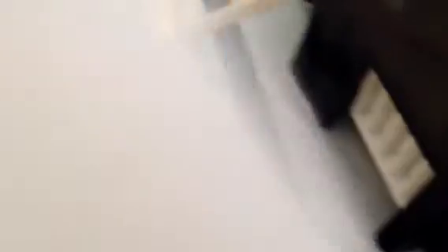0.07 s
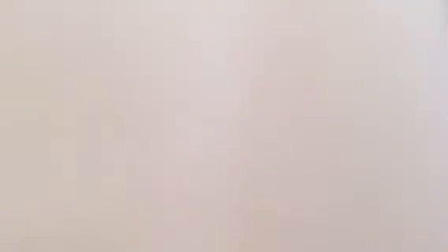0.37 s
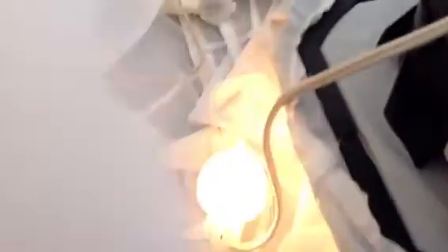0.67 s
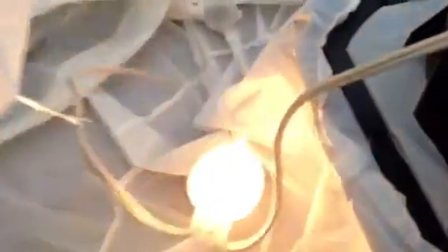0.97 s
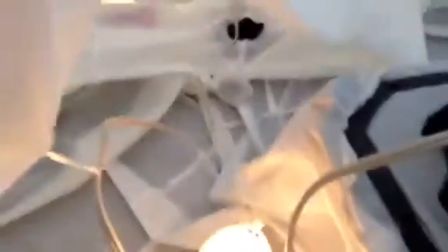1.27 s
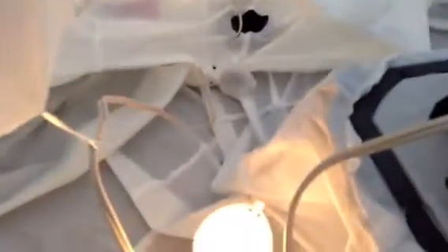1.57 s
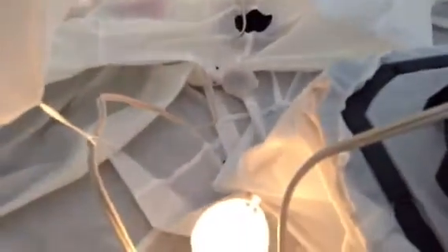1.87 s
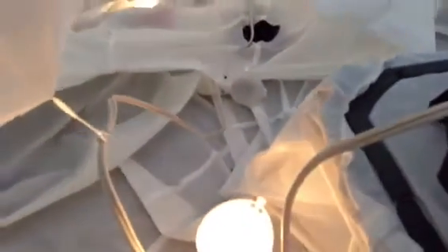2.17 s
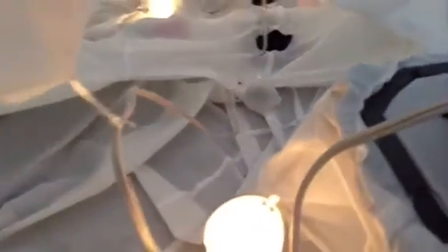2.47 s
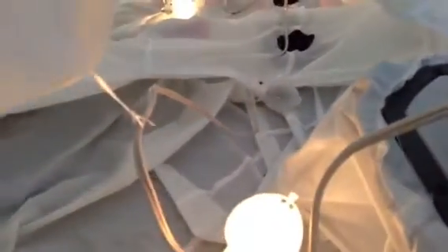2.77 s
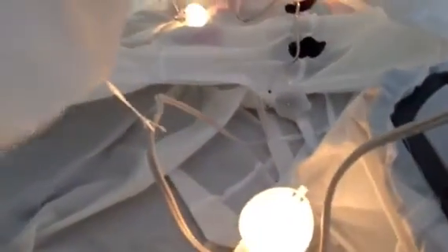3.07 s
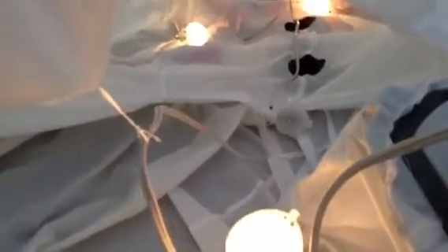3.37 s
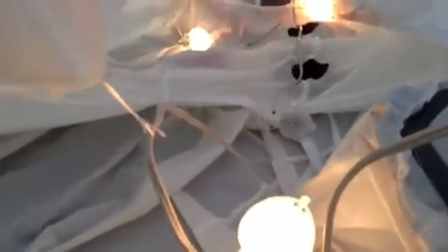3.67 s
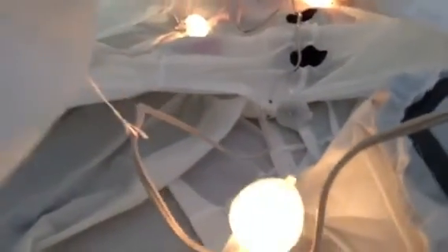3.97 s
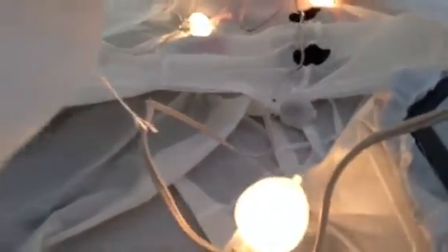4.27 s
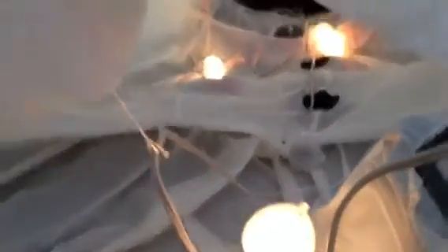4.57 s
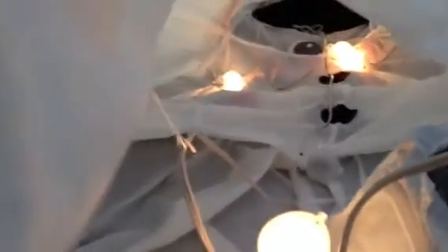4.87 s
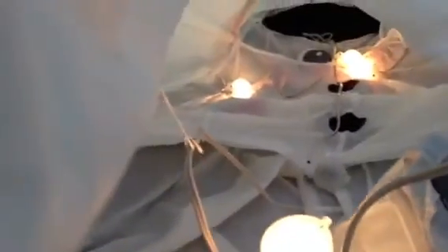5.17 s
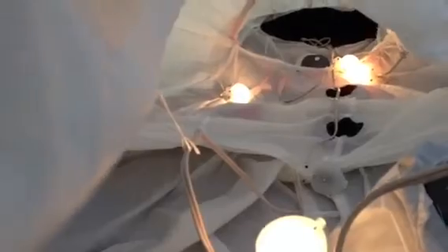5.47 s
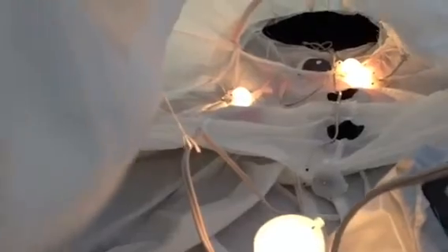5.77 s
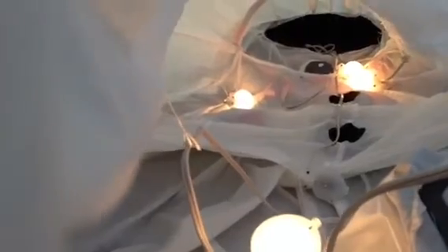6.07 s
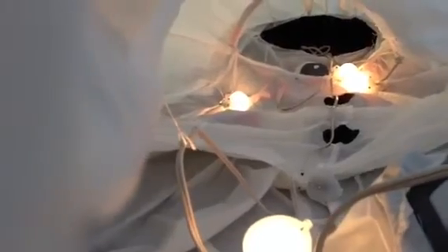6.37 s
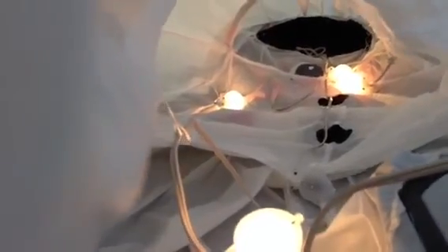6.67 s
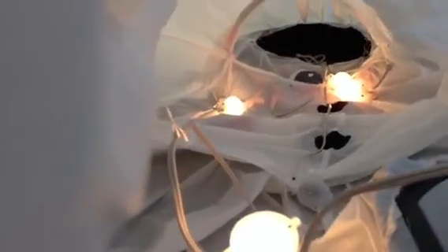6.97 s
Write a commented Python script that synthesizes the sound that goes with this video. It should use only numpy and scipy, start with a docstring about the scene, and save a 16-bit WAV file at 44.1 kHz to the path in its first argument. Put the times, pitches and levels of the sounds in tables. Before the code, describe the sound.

Loud, close scrapes and snaps of nylon open the sound as a hand-held microphone slides into an inflatable, dulled for a moment by the cloth. Inside, a fan whirs with a steady hum, a thin whine and rushing air. About halfway through, softer rustles start and the air grows into a brighter hiss. Several crisp snaps of cloth come near the end while the whine fades and the fan keeps blowing.

```python
"""A small blower keeps a fabric inflatable filled: its blades hum and whine over rushing air.
First, with a brief thin hiss of air, a hand-held camera is pushed inside; nylon drags, rubs and snaps
on it, briefly muffling it. From about one second on, the blower is heard almost alone. Around four
seconds the rubbing returns, and near five the camera crosses the air stream, so the hiss swells. A last
flurry of snaps comes after six. At each loud snap the camera's limiter briefly turns everything down."""
import sys
import numpy as np
from scipy import signal
from scipy.fft import rfft, irfft, next_fast_len
from scipy.io import wavfile
from scipy.ndimage import uniform_filter1d, minimum_filter1d, map_coordinates

SR = 44100
rng = np.random.default_rng(int(sys.argv[2]) if len(sys.argv) > 2 else 0)


def transcribe(u):
    """Save the signal u as a 16-bit wav file named by the first command-line argument.

    u: samples, shape (n,) or (channels, n), limited to [-1, 1]; the rate is SR.
    q: integer samples, one column per channel.
    """
    v = np.clip(np.atleast_2d(u).T, -1, 1)
    q = np.round(v * 32767).astype(np.int16)
    wavfile.write(sys.argv[1], SR, q)


N = 313551

# how often a fan blade passes: time_s, pitch_hz
BLADE_RATE = [(0, 337.8), (1.5, 337.5), (4, 338.2), (7.1, 337.8)]
# the fan's faint higher tones: blade_rate_multiple, level_db
FAINT_TONES = [(3, -45), (6, -68), (10, -56)]
# the whine, louder when the outlet faces the camera: time_s, level_db
WHINE_LEVEL = [(.2, -28), (.9, -34), (1.35, -30), (3.8, -29), (5.03, -26.5), (5.95, -32), (6.45, -36.5),
               (6.9, -40.5)]

# how near the camera is to the air stream: time_s, nearness_0_to_1
NEARNESS = [(0, 0.16), (4.4, 0), (4.9, 0.63), (5.6, 0.97), (7.1, 1)]
# tone colours of the air, from low roar to high hiss: pitch_hz, relative_db
ROAR_COLOUR = [(20, -54), (70, -33), (120, -19.5), (170, -5.5), (230, -2.5), (340, -7), (480, -4.5),
               (720, -2.5), (890, -9), (1030, -3), (1220, -8), (1600, -52), (4000, -70)]
WHIR_COLOUR = [(100, -80), (1000, -42), (1300, 2), (1480, 4.5), (1850, 3), (2100, 2), (2700, -6),
               (3100, -3), (4000, -47)]
WHOOSH_COLOUR = [(100, -80), (2000, -10), (2800, -9), (3300, 1.5), (4300, 0), (5000, 0.5), (5900, -1),
                 (7000, -11.5), (9000, -40)]
FAR_HISS_COLOUR = [(100, -80), (4500, -3.5), (6300, -0.5), (8000, 1.5), (10000, -1), (13000, 2),
                   (15500, -4.5)]
NEAR_HISS_COLOUR = [(100, -80), (5000, -5), (6300, -3), (7200, -3.5), (9000, 1.5), (10200, 3.5),
                    (11500, -3.5), (13000, -3), (15500, -16)]
# air spilling past the nearest fold: pitch_hz, relative_db
SPILL_COLOUR = [(60, -60), (220, 3), (500, -1), (850, -1), (1200, 8), (1450, -2.5), (2000, -34),
                (4000, -50)]
# the whoosh before the air stream lifts it: time_s, level_db
WHOOSH_BASE = [(2.7, -42.5), (3.1, -38), (4.2, -33.5), (5.6, -38), (6.9, -34)]
# pitches the blower's housing lifts or dips: pitch_hz, width_hz, gain_db
HOUSING_RESONANCES = [(1090, 180, -5.5), (2305, 110, 3.5), (2634, 134, 8.5), (3352, 330, 7),
                      (4040, 130, 7.5), (5540, 91, 4), (7000, 300, 3), (8170, 250, 3), (9930, 200, 1.5),
                      (10170, 280, 6), (11640, 300, 3)]
# the hollow echo of a close fold: pitch_hz, width_hz, gain_db
FOLD_ECHO = [(2150, 400, -2.5), (2610, 220, 0), (5100, 690, -4.5), (7370, 1200, 7.5), (8700, 340, -1.5),
             (11400, 420, 1), (11650, 400, 2.5)]

# folds snapping on the camera: start_s, level_db, pitch_hz, length_cycles
FOLD_SNAPS = [(.189, 5.5, 780, 1.7), (.559, 10, 1200, 2.6), (0.9326, 7, 6300, 9.9), (0.9673, 6, 2430, 1.7),
              (1.0028, -0.5, 1820, 0.55), (1.0297, -2.5, 1530, 4.1), (1.629, -6, 4000, 1.3),
              (2.799, -16, 3850, 7), (4.264, -15, 222, 3.3), (4.3828, -8, 332, 8.3), (4.657, -8, 420, 4.9),
              (4.7829, -5.5, 332, 5.3), (4.884, -6, 714, 3.7), (5.158, .5, 950, 3.3),
              (6.139, 7.5, 1740, 3.7), (6.1815, 1, 1120, 2.3), (6.1938, 7, 1300, 4.9),
              (6.410, 6, 1250, 1.1), (6.4246, -4.5, 1120, 3.4), (6.4248, 0.5, 7600, 8.3)]
# the long drag through the opening: time_s, level_db
DRAG_LEVEL = [(.12, -27.5), (.24, -21.5), (.33, -12), (.39, -3.5), (.47, -13.5), (.56, -12.5), (.65, -20.5),
              (.78, -14), (.87, -26), (1.15, -30)]
# nylon rubs, plus a thin, high hiss of air at 0.16 s: peak_s, rise_s, level_db, pitch_hz, sharpness_q
RUBS_AND_HISS = [(0.139, 0.011, -16, 681, 0.79), (0.16, .09, -28, 13780, 5.9),
                 (0.193, 0.003, -7.5, 2480, 0.2), (.27, 0.012, -12.5, 750, 0.35),
                 (.3, 0.0055, -9.5, 1110, 0.4), (0.354, .014, -5, 1500, .6),
                 (0.445, 0.0092, -9.5, 760, 0.96), (0.463, .016, -3.5, 214, 1.4),
                 (0.506, 0.0094, -4, 298, 0.58), (0.536, .02, -6.5, 800, 0.71), (0.6, 0.012, -7, 450, .6),
                 (0.62, 0.019, -11, 1080, 0.79), (0.705, 0.037, -11, 4400, 0.093),
                 (0.916, 0.031, -24, 396, 0.7), (1.012, 0.0096, -14.5, 443, 0.88),
                 (1.053, 0.022, -23, 1800, 0.059), (3.112, 0.076, -31.5, 9600, 2.4),
                 (3.94, 0.029, -25, 2800, 0.19), (4.02, 0.17, -27.5, 307, 1.16),
                 (4.393, 0.072, -23.5, 340, 0.84), (4.425, 0.034, -21.5, 4400, 1.1),
                 (4.433, .033, -20.5, 13000, 1), (4.675, 0.056, -21.5, 12000, .8),
                 (4.706, 0.053, -15.5, 3250, 0.77), (4.73, 0.078, -21.5, 517, 0.21),
                 (4.925, 0.26, -28, 910, 0.4), (5.105, 0.076, -26, 1060, 2.2),
                 (5.334, .035, -17, 2470, 0.92), (5.415, 0.1, -25, 445, 1.1),
                 (5.627, 0.017, -24, 600, 0.44), (6.111, 0.025, -15.5, 6800, 3),
                 (6.126, 0.043, -22, 710, 0.46), (6.224, .042, -15.5, 1370, 1.4),
                 (6.221, 0.031, -16, 6900, 0.66), (6.281, 0.019, -22.5, 1070, 1.8),
                 (7.066, 0.0075, -25.5, 380, 1.8)]
# tone colour of the cloth: pitch_hz, relative_db
NYLON_COLOUR = [(30, -18), (80, -10.5), (170, 9), (1500, 0.5), (5000, -3.5), (10000, -6.5), (15500, -11.5)]
# cloth pressed over the microphone: time_s, cover_0_to_1
MIC_COVER = [(.36, 0.3), (.395, 0.67), (.43, 0.54), (.48, 0.65), (.545, 0.49), (.585, 0.45), (.65, 0.11)]


def fan_blades(hum_db=-27):
    """Spinning blades sing at multiples of their passing rate; swirling air makes each tone flutter."""
    rate_hz = curves(BLADE_RATE)[0] + 0.085 * wobble(5.28)
    phase = 2 * np.pi * np.cumsum(rate_hz) / SR

    def tone(multiple, flutter):
        shake = 1 + flutter * (wobble(75) + 1j * wobble(75))  # shakes both strength and phase
        return np.real(np.exp(1j * multiple * phase) * shake)

    hum = amp(hum_db) * tone(2, flutter=0.027)  # fills the shell evenly
    whine = amp(curves(WHINE_LEVEL)[0]) * tone(5, flutter=0.22)
    return hum + whine + sum(amp(db) * tone(round(k), flutter=0.49) for k, db in FAINT_TONES)


def airflow():
    """A steady roar fills the shell; the higher sounds change with the folds around the camera."""
    near = np.clip(curves(NEARNESS)[0], 0, 1)
    whir_db, whoosh_db, hiss_db = air_levels(near)
    roar = amp(-32.5 - 0.97 * near + 0.1 * wobble(3.8)) * rush(ROAR_COLOUR, patchy_db=1.0)
    spill = amp(-38) * near * rush(SPILL_COLOUR, patchy_db=5)
    whir = amp(whir_db) * rush(WHIR_COLOUR, patchy_db=2.0)
    whoosh = amp(whoosh_db) * rush(WHOOSH_COLOUR, patchy_db=2.0)
    far_hiss = np.sqrt(1 - near) * rush(FAR_HISS_COLOUR, patchy_db=2.6)
    near_hiss = np.sqrt(near) * rush(NEAR_HISS_COLOUR, patchy_db=1.7)
    hiss = amp(hiss_db + 0.13 * wobble(12)) * (far_hiss + near_hiss)
    air = roar + spill + whir + whoosh + hiss
    hollow_air = filtered(air, lambda hz: amp(bumps(FOLD_ECHO, hz)))
    echo_share = near ** 4  # the fold only colours the air once it is very close
    return (1 - echo_share) * air + echo_share * hollow_air


def air_levels(near, crossing_s=4.856, rise_s=0.14, fall_s=0.64):
    """Whir, whoosh and hiss all swell as the camera crosses the air stream once."""
    age_s = np.arange(N) / SR - crossing_s
    swell = np.exp(-np.where(age_s < 0, (age_s / rise_s) ** 2, age_s / fall_s))
    whir_db = -21 + 0.43 * curves(WHINE_LEVEL)[0] + 3 * swell  # from the outlet, like the whine
    whoosh_db = curves(WHOOSH_BASE)[0] + 6 * swell
    hiss_db = -32.5 + 2 * near + 9 * swell
    return whir_db, whoosh_db, hiss_db


def rush(colour, patchy_db):
    """Swirling air: noise with drifting loud and soft patches, coloured by the blower's housing."""
    bands = signal.stft(rng.standard_normal(N), nperseg=512)[2]
    patches = uniform_filter1d(rng.standard_normal(bands.shape), size=4, axis=0)  # smooth over pitch
    patches = uniform_filter1d(patches, size=40, axis=1)  # and over time
    air = signal.istft(bands * amp(patchy_db * unit(patches)), nperseg=512)[1][:N]
    return unit(filtered(air, lambda hz: amp(along(colour, hz) + bumps(HOUSING_RESONANCES, hz))))


def fold_snaps(tick_strength=0.072, tick_s=0.0045, low_cut_hz=190):
    """A fold that flips gives one quickly dying swing and a faint tick."""
    out, t = np.zeros(N + SR), np.arange(SR // 20) / SR
    for start_s, level_db, pitch_hz, length_cycles in FOLD_SNAPS:
        angle = 2 * np.pi * pitch_hz * t
        swing = np.sin(angle) * angle * np.exp(-2 * angle / length_cycles)
        tick = tick_strength * rng.standard_normal(len(t)) * amp(-60 * t / tick_s)
        out[round(start_s * SR):][:len(t)] += amp(level_db) * (swing / np.abs(swing).max() + tick)
    return signal.sosfilt(signal.butter(2, low_cut_hz, "highpass", fs=SR, output="sos"), out[:N])


def opening_drag(catch_db=2.1, catches_per_s=35):
    """The opening catches unevenly on the camera; the flatter it is pressed, the deeper it sounds."""
    pressed = np.clip(1.55 * curves(MIC_COVER)[0], 0, 1)
    level_db = np.interp(np.arange(N) / SR, *np.transpose(DRAG_LEVEL), right=-np.inf)
    light = np.sqrt(1 - pressed) * ring(grainy_noise(), pitch_hz=1500, sharpness_q=0.13)
    deep = np.sqrt(pressed) * ring(grainy_noise(), pitch_hz=273, sharpness_q=0.5)
    return amp(level_db + catch_db * wobble(catches_per_s)) * (light + deep)


def rubs_and_hiss(fall_over_rise=1.07):
    """Nylon rubs on the camera, and air hisses briefly at the start; each sound swells and fades."""
    out, t, noise = np.zeros(N), np.arange(N) / SR, grainy_noise()
    for peak_s, rise_s, level_db, pitch_hz, sharpness_q in RUBS_AND_HISS:
        progress = (t - peak_s) / np.where(t < peak_s, rise_s, rise_s * fall_over_rise)
        span = np.abs(progress) < 3
        swell = np.exp(-progress[span] ** 2)
        burst = np.roll(noise, rng.integers(N))[span]
        out[span] += amp(level_db) * swell * ring(burst, pitch_hz, sharpness_q)
    return out


def grainy_noise(clicks_per_s=2500, grain_share=0.37, judder_db=2):
    """Tiny clicks, like the slips of sliding nylon, mixed with smooth noise and juddering in strength."""
    clicks = unit(rng.standard_normal(N) * (rng.random(N) < clicks_per_s / SR))
    noise = np.sqrt(grain_share) * clicks + np.sqrt(1 - grain_share) * rng.standard_normal(N)
    return noise * amp(judder_db * wobble(160))


def ring(noise, pitch_hz, sharpness_q):
    """Make noise ring as a rubbed patch of cloth does; more sharpness gives a clearer pitch."""
    def response(hz):
        resonance = 1j * hz / (pitch_hz ** 2 - hz ** 2 + 1j * hz * pitch_hz / sharpness_q)
        return amp(along(NYLON_COLOUR, hz)) * resonance

    return unit(filtered(noise, response))


def amp(db):
    """Turn decibels into a number to multiply by."""
    return 10 ** (np.asarray(db) / 20)


def unit(x):
    """Scale a signal to an average strength (rms) of 1."""
    return x / np.sqrt(np.mean(x ** 2) + 1e-20)


def along(colour, hz):
    """Read a tone colour in dB between its listed pitches."""
    pitch_hz, relative_db = np.transpose(colour)
    return np.interp(np.log(hz + 1), np.log(pitch_hz + 1), relative_db)


def bumps(rows, hz):
    """Add up rounded peaks and dips, in dB."""
    return sum(db / (1 + (2 * (hz - centre) / width) ** 2) for centre, width, db in rows)


def curves(rows):
    """One value per sample for each column after the time."""
    time_s, *columns = np.transpose(rows)
    return [np.interp(np.arange(N) / SR, time_s, column) for column in columns]


def wobble(points_per_s):
    """A smooth curve through random points."""
    points = rng.standard_normal(int(N * points_per_s / SR) + 4)
    return map_coordinates(points, [np.arange(N) * points_per_s / SR])


def filtered(x, response):
    """Turn each frequency in x up or down by response(hz)."""
    size = next_fast_len(len(x) + 8192)
    return irfft(rfft(x, size) * response(np.fft.rfftfreq(size, 1 / SR)), size)[:len(x)]


def scene(muffle_hz=3800):
    """One microphone hears it all, and loses the treble while cloth covers it."""
    sound = fan_blades() + airflow() + opening_drag() + rubs_and_hiss() + fold_snaps()
    cover = np.clip(curves(MIC_COVER)[0], 0, 1)
    muffled = filtered(sound, lambda hz: 1 / (1 + (hz / muffle_hz) ** 4))
    return np.tile((1 - cover) * sound + cover * muffled, (2, 1))


def record(dry, start_s=0.12, ceiling=0.83, release_db_per_s=150, top_hz=15550):
    """The camera starts, turns loud peaks down at once, soon recovers and cuts the highest treble."""
    t = np.arange(N) / SR
    sound = dry[0] * np.clip((t - start_s) * SR / 64, 0, 1)  # fades in over 64 samples
    over_db = 20 * np.log10(np.maximum(np.abs(sound) / ceiling, 1))
    dip_db = np.maximum.accumulate(over_db + release_db_per_s * t) - release_db_per_s * t
    gain = uniform_filter1d(minimum_filter1d(amp(-dip_db), size=17), size=17)  # rounds off each dip
    return np.tile(filtered(sound * gain, lambda hz: hz < top_hz), (2, 1))


dry = scene()
out = record(dry)
transcribe(out)
```